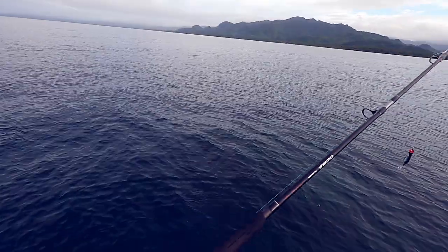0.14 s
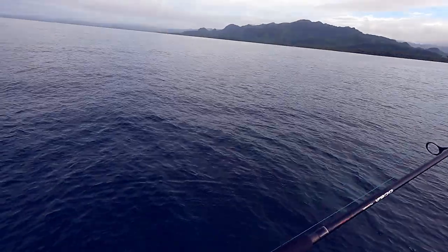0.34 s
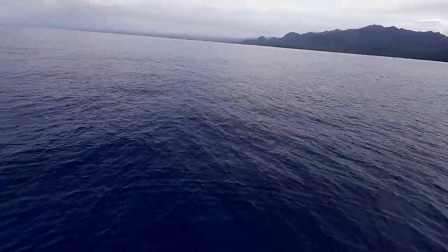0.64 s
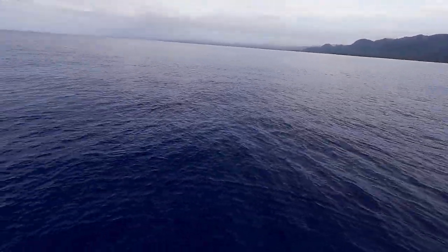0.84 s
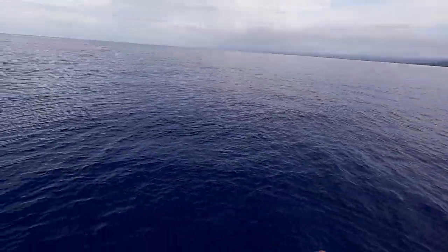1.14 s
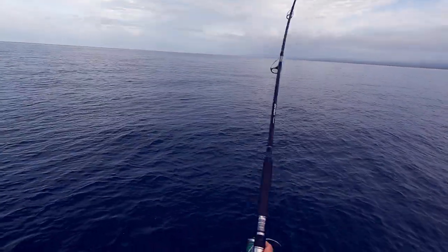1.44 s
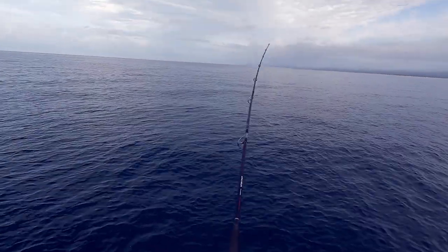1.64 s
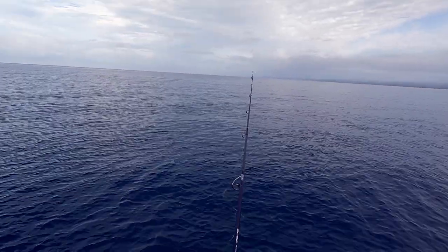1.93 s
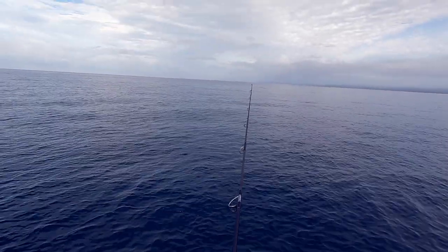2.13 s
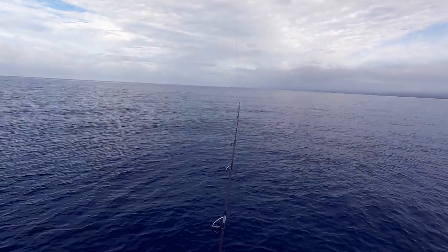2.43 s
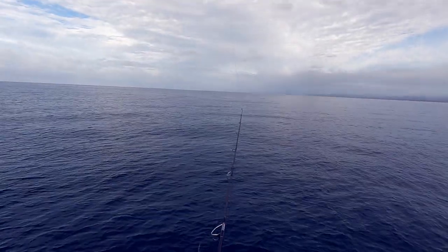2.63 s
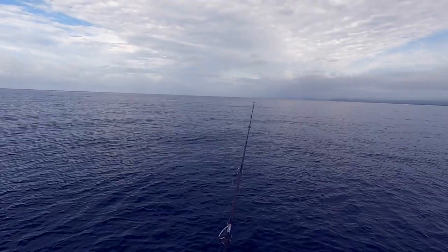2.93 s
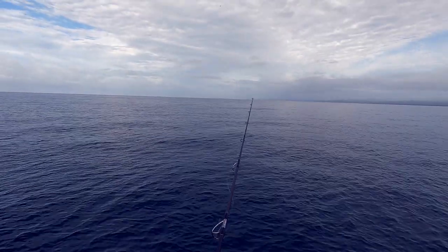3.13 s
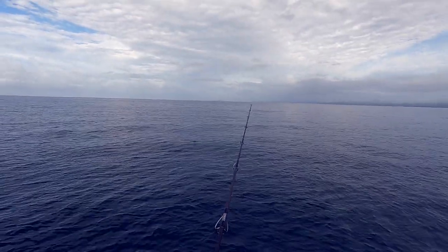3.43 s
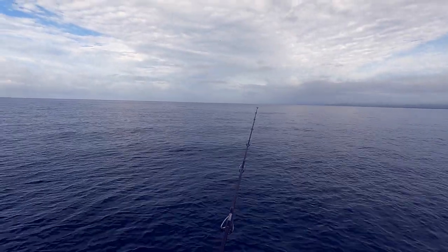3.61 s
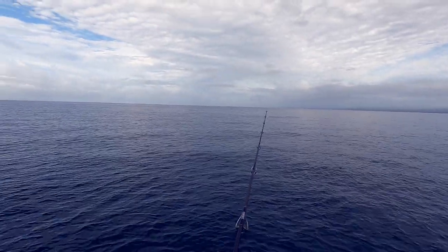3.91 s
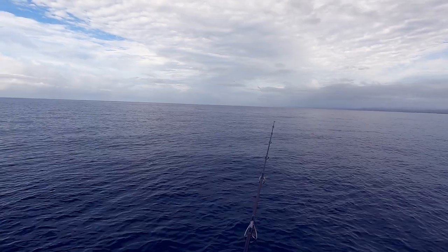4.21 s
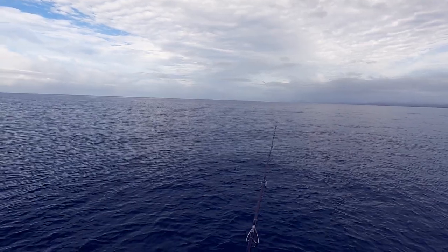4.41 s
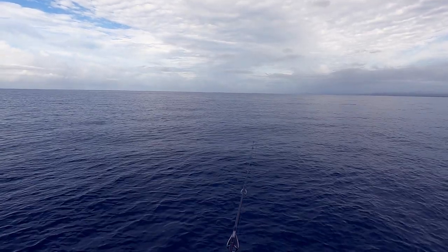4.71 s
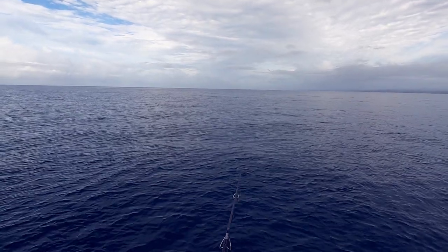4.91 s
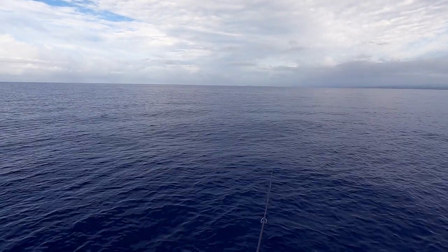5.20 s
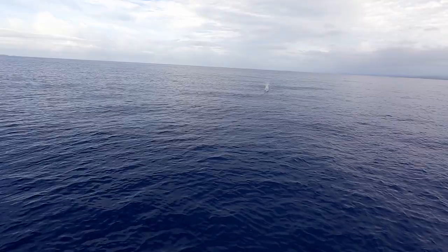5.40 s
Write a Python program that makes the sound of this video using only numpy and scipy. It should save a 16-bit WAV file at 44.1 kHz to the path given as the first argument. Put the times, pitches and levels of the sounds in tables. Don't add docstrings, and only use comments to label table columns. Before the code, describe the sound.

Fishing rod whips through a cast, line hisses off the reel in slowing coils, the bail snaps shut, water slops on a small boat's hull.

```python
import sys
import numpy as np
from scipy import signal
from scipy.fft import rfft, irfft, next_fast_len
from scipy.io import wavfile
from scipy.ndimage import uniform_filter1d, map_coordinates

SR = 44100
rng = np.random.default_rng(int(sys.argv[2]) if len(sys.argv) > 2 else 0)


def store_pcm(level_fs):
    pcm = np.round(np.clip(level_fs, -1, 1) * 32767).astype(np.int16)
    wavfile.write(sys.argv[1], SR, np.atleast_2d(pcm).T)


def ratio(d):
    e = np.asarray(d, float) / 20
    return 10 ** e


N = 244755

# t/s, coil rate/Hz, hiss level/dB
LINE_RUN = [
    (1.57, 164, -43),
    (1.72, 137, -35.5),
    (1.87, 150, -34.5),
    (2.18, 119, -36.5),
    (2.55, 97.5, -39.5),
    (3.0, 70.3, -43.5),
    (3.5, 59, -45.5),
    (4.1, 54.2, -47.5),
    (4.612, 55, -48.5),
]
# f/share of centre, level/dB
HISS_SPECTRUM = [(.1, -14), (.3, -4.5), (.55, -3.5), (.8, 3.5), (1.0, 9), (1.2, 4), (1.5, -11), (2.01, -24),
                 (3, -21)]
HISS_HZ, HISS_HZ_PER_COIL, HISS_TOP_HZ = 2200, 69.9, 12400
HISS_SPREADS = 0.23
SLAP_SHARE, SLAP_GROWS = 0.06, 0.17
SLAP_SOFT_S = 0.002
SLACK_S, SLACK_WIDTH_S, SLACK_DB = 1.655, 0.016, 33
BUMP_S, BUMP_WIDTH_S, BUMP_DB = 5.2, 0.016, 4
# t/s, level/dB
RIM_TOUCHES = [(1.574, -28.5), (1.7, -34), (1.8, -34.5), (1.91, -33), (2.04, -40), (2.19, -40),
               (2.38, -42.5), (2.33, -43.5), (2.5, -48.5), (2.56, -49), (2.71, -46), (2.92, -46),
               (3.14, -55), (3.178, -58), (3.4, -56), (3.53, -63), (3.588, -59), (3.73, -49.5), (3.82, -62),
               (3.935, -51), (3.958, -52), (4.05, -58), (4.132, -56), (4.246, -50), (4.31, -58),
               (4.395, -50), (4.506, -55.5), (4.565, -49.5), (4.267, -54), (4.43, -53), (2.62, -56),
               (1.945, -48), (2.085, -47)]
RIM_RISE_DB_S, RIM_FALL_DB_S = 488, 273
# t/s, level/dB
RIM_STEADY = [(1.57, -47.5), (2.9, -62), (3.8, -55), (4.05, -48), (4.6, -49.5)]
TICKING_DB = 0.5
# f/Hz, width/Hz, level/dB
SPOOL_MODES = [(1178, 190, -6.5), (2180, 600, -9), (3385, 106, 3), (4700, 260, -8)]
# f/Hz, width/Hz, level/dB
FLANGE_MODES = [(10600, 35, 1), (12000, 60, -9), (13260, 33, -8.5)]
# t/s, peak level/dB
COIL_KNOCKS = [(3.585, -50), (3.6462, -41), (3.724, -43), (3.8014, -42), (3.8493, -56), (3.8702, -43),
               (3.9066, -36), (3.9275, -42), (3.9535, -39), (3.9888, -51), (4.0132, -38), (4.0373, -35),
               (4.0585, -41), (4.0922, -36.5), (4.1281, -41), (4.169, -40), (4.2094, -41), (4.2314, -38),
               (4.2841, -39), (4.3032, -35), (4.3242, -39), (4.3416, -38), (4.3571, -41), (4.3786, -33),
               (4.3927, -31), (4.4115, -32.5), (4.4474, -43), (4.4813, -44), (4.5013, -41), (4.5182, -40),
               (4.536, -33), (4.5562, -33), (4.5716, -39)]
# f/Hz, width/Hz, level/dB
RIM_MODES = [(1243, 120, -3.5), (2180, 240, -1.5), (3390, 184, 4), (4700, 550, -6.5), (6500, 2900, -22)]

# t/s, peak level/dB, low part level/dB
RELEASE_BLOWS = [
    (1.573, -26, -18),
    (1.5775, -11, -4),
    (1.5865, -9, -4.5),
    (1.5981, -8.5, 4),
    (1.605, -16, -25),
    (1.639, -32, -15),
    (1.6913, -19, -23),
]
RELEASE_T60_S = 0.024
# f/Hz, width/Hz, level/dB
GUIDE_MODES = [(1500, 330, -3), (2300, 790, -3), (2960, 150, -1), (3380, 310, -6.5), (4500, 190, -3),
               (6360, 780, -9.5), (11800, 980, -11.5)]
# t/s, peak level/dB, low part level/dB, t60/s
BAIL_BLOWS = [
    (4.6104, -17.5, -1, 0.024),
    (4.6184, -9, -13.5, 0.02),
    (4.6288, 2.5, -6.5, 0.022),
    (4.6312, -7, 0, 0.0099),
    (4.6374, -44, -30, 0.014),
    (4.6563, -22, 4.5, 0.05),
    (4.676, -27.5, 1, 0.02),
    (4.6835, -14, -9, 0.023),
    (4.686, -10.5, -3.5, 0.021),
    (4.7024, -27, 7.5, 0.023),
]
# f/Hz, width/Hz, level/dB
BAIL_MODES = [(1200, 420, -6.5), (2010, 230, 0.5), (3150, 930, -10.5), (4440, 250, -3.5), (4930, 480, -1.5),
              (6100, 920, -14.5), (8700, 400, -11.5), (10800, 1700, -24)]
PART_LOW_HZ = 420
# start t/s, end t/s, f/Hz, level/dB
SPRING_SQUEAK = (4.716, 4.764, 5600, -57)
# t/s, level/dB, hold/s, gear tone share/0-1
CRANK_STROKES = [
    (4.777, -47, .01, 0.32),
    (5.085, -56, .01, 0.3),
    (5.17, -57.5, .03, 0.2),
    (5.192, -60.5, 0.17, 0.62),
    (5.31, -62.5, 0.036, 0.1),
    (5.403, -58, 0.043, 0),
    (5.508, -58.5, 0.03, .1),
]
RUB_RISE_DB_S, RUB_FALL_DB_S = 446, 253
# f/Hz, level/dB
SCUFF_SPECTRUM = [(600, -23), (1500, 0), (3000, -7.5), (6000, -13), (9000, -22.5), (13000, -28.5)]
# f/Hz, width/Hz, level/dB
GEAR_MODES = [(4800, 350, -1), (8600, 500, -3), (10400, 400, -9)]

# t/s, level/dB, upper edge f/Hz
CAST_SWISH = [(1.34, -72, 2000), (1.41, -64, 2800), (1.48, -46, 4430), (1.565, -38.5, 6840),
              (1.6, -26.5, 6600), (1.64, -39, 4500), (1.72, -30.5, 4730), (1.9, -41.5, 3230),
              (2.27, -47.5, 2520), (2.5, -56, 2000)]
# t/s, level/dB, upper edge f/Hz
BACK_SWISH = [(.58, -58, 1500), (.7, -57, 2600), (.8, -59, 2300), (.88, -56.5, 2830), (.97, -59, 2980),
              (1.02, -65, 2300), (1.08, -76, 1500)]
# t/s, level/dB
BLANK_HUM = [(1.73, -49), (1.79, -37.5), (1.822, -29), (1.88, -43), (1.95, -41), (2.03, -38.5),
             (2.115, -40), (2.175, -30), (2.28, -49), (2.352, -35), (2.46, -40), (2.54, -61)]
HUM_RISE_DB_S, HUM_FALL_DB_S, HUM_OCTAVE_DB = 226, 354, -10.5

# t/s, peak level/dB, f/Hz
DRY_TICKS = [(0.1487, -52, 4130), (0.608, -48, 6560), (0.618, -52, 5450), (0.634, -54, 4300),
             (1.178, -56, 5050), (1.187, -48, 6500), (1.195, -53, 4620), (1.2244, -60, 4830),
             (1.366, -53.5, 5450), (1.723, -38, 4250), (3.884, -28, 7340), (3.907, -32, 5800),
             (4.7641, -48, 5100), (4.825, -41.5, 4160), (4.961, -52, 6020), (4.963, -46, 2440),
             (5.057, -60, 6000), (4.986, -46, 3950), (5.0724, -34.5, 4120), (5.4644, -51, 4800),
             (5.5294, -67, 5200)]
DRY_T60_S, DRY_CRACK_SHARE = 0.03, 0.6
# t/s, peak level/dB, f/Hz
RINGING_TICKS = [(0.193, -66, 4430), (0.2054, -59, 4000), (0.514, -61, 4400), (1.119, -66, 3800),
                 (4.8173, -44, 3500), (4.844, -45, 4740), (4.855, -40, 4410), (4.999, -41, 4100),
                 (5.0796, -39.5, 3800), (5.4555, -51, 3930), (5.517, -55, 3380)]
RINGING_T60_S, RINGING_CRACK_SHARE = 0.07, 0.12

# t/s, level/dB, hold/s, brightness/dB
HULL_SLOPS = [(0.245, -47.5, 0.2, -13.5), (0.348, -46, 0.01, 0), (0.359, -38.5, 0.0195, -0.5),
              (.41, -51, .025, 0), (0.432, -40.5, 0.0057, 2.5), (0.48, -49, 0.01, -25),
              (0.712, -60, 0.054, -10.5), (1.515, -38, 0.066, -13.5), (1.55, -43, 0.022, -8),
              (1.73, -40, 0.077, -1.5), (1.849, -30, 0.068, -5), (1.94, -42.5, 0.2, 10),
              (2.12, -44.5, 0.15, 15), (2.615, -47.5, 0.013, -20.5), (2.762, -51, 0.014, -18),
              (3.08, -61, 0.019, -16), (3.261, -35.5, 0.055, -6.5), (3.347, -32, 0.025, -8),
              (3.387, -34.5, 0.018, -9), (3.493, -51.5, 0.029, -16), (3.89, -56, 0.22, -10),
              (4.198, -67, 0.14, -10), (4.517, -57, 0.27, -19), (4.675, -37, 0.03, -3.5),
              (4.777, -42.5, 0.091, -2), (4.943, -51, 0.07, 2), (5.374, -45.5, 0.037, -4.5)]
SLOP_RISE_DB_S, SLOP_FALL_DB_S, DULLS_DB_S = 907, 131, 53.5
# f/Hz, density/dB per Hz
SLOP_SPECTRUM = [(71, -9.5), (275, -3), (700, -9), (1500, -12), (3060, -25.5), (7000, -59.5), (12000, -81),
                 (22000, -120)]
# t/s, level/dB
LAPPING = [(0, -56), (.6, -54), (1.4, -58), (2.4, -45), (3.2, -55.5), (3.75, -55.5), (5.0, -56.5),
           (5.35, -59.5), (5.55, -50.5)]
LAP_BRIGHT_DB = -18
# t/s, peak level/dB, f/Hz, t60/s
AIR_POCKETS = [(0.224, -39, 665, 0.071), (0.221, -39, 1297, 0.11), (0.25, -48, 1240, 0.18),
               (0.262, -41, 676, 0.35), (0.3, -43, 760, 0.13), (0.357, -30, 638, 0.19),
               (0.378, -24.5, 590, 0.11), (0.408, -28, 688, 0.18), (0.4, -35.5, 1545, 0.2),
               (0.436, -26, 616, 0.072), (0.458, -33, 715, 0.2), (0.505, -40, 755, .3),
               (0.343, -37, 1170, .1), (0.482, -31, 202, 0.17), (0.701, -41, 885, 0.35),
               (0.73, -39, 832, 0.17), (1.107, -44, 1274, 0.1), (1.6, -25.5, 701, 0.44),
               (1.72, -24.5, 1130, 0.094), (1.855, -23.5, 516, 0.17), (1.865, -16.5, 1252, 0.044),
               (1.89, -18.5, 462, 0.12), (2.11, -18, 707, 0.041), (2.112, -26.5, 1226, 0.16),
               (2.29, -39, 983, 0.13), (4.692, -26.5, 347, 0.37), (4.7, -33, 474, .15),
               (4.715, -28.5, 243, 0.3), (2.607, -35, 406, 0.12), (2.85, -40, 715, 0.16),
               (2.99, -37, 427, 0.27), (3.087, -35, 1170, 0.14), (3.246, -23.5, 1208, 0.066),
               (3.262, -30, 1100, 0.089), (3.246, -29, 1550, .06), (3.247, -39, 2130, 0.058),
               (3.247, -34.5, 3080, 0.067), (3.31, -27, 333, .15), (3.248, -20, 592, 0.038),
               (3.282, -19, 625, 0.07), (3.28, -25, 449, 0.11), (3.278, -40, 2580, 0.1),
               (3.393, -38, 2750, .15), (3.352, -22.5, 830, 0.1), (3.4, -30, 797, 0.083),
               (3.489, -35, 604, 0.35), (3.493, -35.5, 1284, 0.15), (4.766, -32, 982, 0.23),
               (5.078, -26.5, 1004, 0.024), (5.368, -40, 716, 0.1), (5.39, -37, 1200, .15),
               (5.421, -44, 2460, .1), (5.443, -25.5, 998, 0.094), (5.455, -36.5, 1068, 0.19),
               (5.47, -37.5, 948, 0.22)]
# t/s, peak level/dB, f/Hz, t60/s
MORE_POCKETS = [
    (4.7658, -28.5, 2200, 0.091),
    (4.994, -40.5, 1620, 0.2),
    (5.0766, -24.5, 2200, 0.015),
]
# t/s, level/dB, f/Hz, t60/s
SPRAY_BURSTS = [(0.3478, -65, 7960, 0.036), (0.3597, -75, 8350, 0.041), (0.408, -52, 3880, 0.1),
                (0.411, -65, 8000, 0.088), (0.357, -44, 1702, 0.12), (0.4357, -41, 1684, .07),
                (0.7, -56, 1020, .1), (0.509, -66, 6500, .05), (0.716, -64, 9800, .03),
                (3.246, -39, 2840, 0.078), (3.275, -43, 2600, 0.1), (3.3518, -39.5, 3550, 0.13),
                (3.392, -45, 2790, 0.19), (3.394, -42, 3850, .1), (3.425, -51, 2980, 0.075),
                (3.4817, -45, 3220, 0.046), (3.87, -48.5, 1786, 0.61), (3.984, -33.5, 1500, 0.057)]

# t/s, level/dB
GUSTS = [(0, -64), (.45, -65.5), (1.0, -67), (1.16, -56), (1.37, -42.5), (1.59, -46), (1.7, -38.5),
         (2.04, -43.5), (2.3, -40.5), (2.63, -40), (2.89, -39), (3.17, -34), (3.57, -45), (4.2, -46),
         (4.64, -43.5), (4.9, -36.5), (5.33, -39.5), (5.55, -57.5)]
# f/Hz, level/dB
BUFFET_SPECTRUM = [(12, -5), (30, -1.5), (60, -2.5), (100, -8.5), (200, -31), (600, -47.5), (2500, -91),
                   (8000, -120)]
# t/s, level/dB
CLOTH_THUMPS = [(1.26, -42), (1.686, -42), (1.86, -41), (1.97, -45), (2.05, -49), (2.165, -36), (4.69, -41),
                (4.86, -39), (5.2, -42), (2.608, -36.5), (2.65, -43), (2.753, -29), (2.98, -45),
                (3.089, -29), (3.142, -26.5), (3.185, -48), (3.232, -35)]
THUMP_RISE_DB_S, THUMP_FALL_DB_S = 2500, 448
# f/Hz, level/dB
THUMP_SPECTRUM = [(25, -9), (60, -2), (150, 5), (400, -18.5), (800, -44), (4000, -120)]
# t/s, level/dB
CLOTH_FLAPS = [(.45, -67), (1.62, -35.5), (1.8, -30.5), (1.97, -47), (2.19, -38.5), (3.17, -46.5),
               (3.34, -36), (4.7, -56), (4.88, -40), (5.3, -49.5)]
FLAP_RISE_DB_S, FLAP_FALL_DB_S = 162, 132
# f/Hz, level/dB
CLOTH_SPECTRUM = [(30, -34), (70, -12), (110, -8), (170, 3), (260, -7), (500, -55), (1500, -64.5),
                  (8000, -120)]
CLOTH_DB, CLOTH_GROWS = -54.5, 0.073
# f/Hz, density/dB per Hz
SEA_SPECTRUM = [(70, -26), (170, 0), (400, -7), (800, -22), (1150, -12), (1900, -29), (3000, -39),
                (7000, -42), (15500, -57)]
SEA_DB = -56

# f/Hz, likeness/0-1
PORT_LIKENESS = [(90, 1), (250, 0.97), (1000, 0.81), (3000, 0.87), (6000, 0.87), (10000, 0.47),
                 (15000, 0.22)]
# f/Hz, level/dB
PORT_TILT = [(60, 2), (200, 0), (700, .5), (2300, 2), (4400, -2), (8100, -7), (15000, -11)]
# f/Hz, phase/rad
PORT_LEAD = [(100, 0), (780, -.1), (4000, -.8), (7000, -1.3), (9500, -1.7), (12000, -3.2), (15500, -4.1)]
# f/Hz, level/dB
CAPSULE = [(6000, -2), (9000, -6.5), (12500, -9.5), (14000, -11.5), (15700, -19), (15900, -49)]


def line():
    coils, hiss_db = curves(LINE_RUN)
    bump = lambda s, width: np.exp(-((np.arange(N) / SR - s) / width) ** 4)
    hiss_db = hiss_db - SLACK_DB * bump(SLACK_S, SLACK_WIDTH_S) + BUMP_DB * bump(BUMP_S, BUMP_WIDTH_S)

    phase = np.cumsum(2 * coils * (1 + 0.097 * wobble(40))) / SR
    count = phase.astype(int)
    contacts = count[-1] + 1
    size_db = 2 * rng.standard_normal(contacts).clip(-2, 1.5) - 5 * (np.arange(contacts) % 2)
    since_s = (phase % 1) / (2 * coils)
    slap = ratio(size_db)[count] * ratio(-60 * since_s / 0.022)
    slap = unit(uniform_filter1d(slap, size=int(SLAP_SOFT_S * SR)))
    share = np.clip(SLAP_SHARE + SLAP_GROWS * np.log2(coils.max() / coils), 0, 1)
    gate = 1 - share + share * slap

    def hiss_shape(hz, t):
        centre = np.minimum(HISS_HZ + HISS_HZ_PER_COIL * curves(LINE_RUN, t)[0], HISS_TOP_HZ)
        return along(HISS_SPECTRUM, (hz / centre) ** (centre / HISS_TOP_HZ) ** HISS_SPREADS)

    hiss = rush(hiss_shape, patchy_db=2.5)
    rubbing = noise_pair() * ratio(1.9 * wobble(45)) * gate * (0.62 + 0.31 * slap)
    rim = unit(filtered(rubbing, resonances(SPOOL_MODES)))
    flange = unit(filtered(noise_pair() * ratio(4 * wobble(22)), lambda f: resonances(FLANGE_MODES)(f) ** 2))
    ticks = unit(filtered(noise_pair() * slap, lambda f: f / (f + 1500j) / (1 + (f / 11000) ** 4)))
    lip = unit(filtered(noise_pair() * (0.4 + 0.52 * slap), resonances(SPOOL_MODES[2:3])))
    touch = swells(RIM_TOUCHES, RIM_RISE_DB_S, RIM_FALL_DB_S).sum(0) * (lip + ratio(-7.5) * rim)
    steady = ratio(curves(RIM_STEADY)[0]) * (rim + ratio(TICKING_DB) * ticks + ratio(-20.5) * flange)
    return during(LINE_RUN) * (ratio(hiss_db) * gate * hiss + touch + steady)


def strikes():
    out, t = np.zeros((2, N)), np.arange(SR // 40) / SR
    for s, db in COIL_KNOCKS:
        contact = ratio(-60 * t / 0.018) * (1 - np.exp(-t / 0.00065)) * noise_pair(len(t))
        contact[0, 40] += 4.5
        add(out, s, ratio(db + 13.5) * contact)
    return filtered(out, resonances(RIM_MODES))


def reel():
    strokes = swells(CRANK_STROKES, RUB_RISE_DB_S, RUB_FALL_DB_S)
    grain = lambda: noise_pair() * ratio(2.0 * wobble(110))
    scuff = unit(filtered(grain(), lambda f: ratio(along(SCUFF_SPECTRUM, f))))
    gears = unit(filtered(grain(), lambda f: resonances(GEAR_MODES)(f) ** 2))
    gear_level = 2.35 * np.transpose(CRANK_STROKES)[-1] ** 2 @ strokes
    crank = strokes.sum(0) * scuff + gear_level * gears

    release = knocked([row + (RELEASE_T60_S,) for row in RELEASE_BLOWS], GUIDE_MODES, tail_db=-14.0)
    bail = knocked(BAIL_BLOWS, BAIL_MODES, tail_db=-16.0)
    start, end, hz, db = SPRING_SQUEAK
    tone = np.sin(2 * np.pi * hz * np.arange(N) / SR)
    squeak = ratio(db) * during([[start], [end]]) * tone * [[1], [0]]
    return release + bail + squeak + crank


def knocked(blows, modes, tail_db):
    high, low, t = np.zeros((2, N)), np.zeros((2, N)), np.arange(SR // 16) / SR
    for s, db, low_db, t60 in blows:
        decay = ratio(-60 * t / t60) + ratio(tail_db - 60 * t / 0.12)
        blow = noise_pair(len(t)).clip(-1.5, 1.5) * (1 - np.exp(-t / 0.00024)) * decay
        blow[0, 50] += 6
        add(high, s, ratio(db + 4.0) * blow)
        add(low, s, ratio(db + low_db + 7.5) * blow)
    wide = lambda f: ratio(-17.0) * (f / 1300) ** 3 / (1 + (f / 1300) ** 3) / (1 + (f / 7000) ** 2)
    low_part = filtered(low, lambda f: resonances(modes[:3])(f) * (f / (f - 1j * PART_LOW_HZ)) ** 2)
    return low_part + filtered(high, lambda f: resonances(modes[3:])(f) + wide(f))


def rod():
    level = swells(BLANK_HUM, HUM_RISE_DB_S, HUM_FALL_DB_S).sum(0)
    turn = 2 * np.pi * np.cumsum(curves(LINE_RUN)[0]) / SR
    hum = np.sqrt(2) * level * (np.sin(turn) + ratio(HUM_OCTAVE_DB) * np.sin(2 * turn))
    return swish(BACK_SWISH, steep=4.5) + swish(CAST_SWISH, steep=1.2) + hum * [[1], [0]]


def swish(rows, steep):
    def shape(hz, t):
        bass_db = -7 * np.log2(350 / (hz + 30)).clip(0)
        return bass_db - 18 * np.minimum((hz / curves(rows, t)[1]) ** steep, 6)

    return during(rows, 0.026) * ratio(curves(rows)[0]) * rush(shape, patchy_db=1.0)


def tackle():
    out, t = np.zeros((2, N)), np.arange(SR // 12) / SR
    dry_ticks = [row + (DRY_T60_S, DRY_CRACK_SHARE) for row in DRY_TICKS]
    ringing = [row + (RINGING_T60_S, RINGING_CRACK_SHARE) for row in RINGING_TICKS]
    for s, db, hz, t60, share in dry_ticks + ringing:
        rough = uniform_filter1d(noise_pair(len(t)), size=60, axis=1)
        ring = (0.39 + 6 * rough) * np.sin(2 * np.pi * hz * t) * ratio(-60 * t / t60) * (1 - np.exp(-t / 0.00009))
        edge = uniform_filter1d(noise_pair(len(t)), size=5, axis=1)
        crack = 1.84 * edge * np.sin(2 * np.pi * 0.9 * hz * t) * ratio(-60 * t / 0.03)
        add(out, s, ratio(db + 1.5) * ((1 - share) * ring + share * crack))
    return out


def water():
    return slops() + pockets()


def slops():
    t = np.arange(0, N, 64) / SR
    each = swells(HULL_SLOPS, SLOP_RISE_DB_S, SLOP_FALL_DB_S, t)
    lap = ratio(curves(LAPPING, t)[0])
    fresh_db = np.array([b - DULLS_DB_S * (t - s).clip(0) for s, _, _, b in HULL_SLOPS]).clip(LAP_BRIGHT_DB)
    level = each.max(0) + lap
    power = (each ** 2).sum(0) + lap ** 2
    colour_db = ((each ** 2 * fresh_db).sum(0) + lap ** 2 * LAP_BRIGHT_DB) / power

    def shape(hz, at):
        bright_db = np.clip(np.interp(at, t, colour_db), -20, 1) + 5
        return along(SLOP_SPECTRUM, hz) + bright_db * np.log2(hz / 500 + 0.00078).clip(0, 2.5) / 0.9

    slop = rush(shape, patchy_db=2.0)
    return np.interp(np.arange(N) / SR, t, level) * ratio(-1.5 + 1.9 * wobble(110)) * slop


def pockets():
    out, t = np.zeros((2, N)), np.arange(SR // 8) / SR
    smooth = lambda a, b: uniform_filter1d(uniform_filter1d(noise_pair(len(t)), size=a), size=b)
    for s, db, hz, t60 in AIR_POCKETS + MORE_POCKETS:
        rough = [[.85], [0]] + 5 * smooth(50, 30)
        pocket = rough * np.sin(2 * np.pi * np.cumsum(hz * (1 + 0.066 * t / t60)) / SR)
        slap = 1.1 * smooth(10, 7) * ratio(-60 * t / 0.023)
        add(out, s, ratio(db - 5.5 - 60 * t / t60) * (1 - np.exp(-t / 0.00049)) * (pocket + slap))
    return out


def spray():
    out, t = np.zeros((2, N)), np.arange(SR // 6) / SR
    for s, db, hz, t60 in SPRAY_BURSTS:
        drops = unit(uniform_filter1d(noise_pair(len(t)), size=int(8e4 / hz), axis=1))
        level = ratio(db - 60 * t / t60) * (1 - np.exp(-t / 0.0012))
        add(out, s, level * drops * np.sin(2 * np.pi * hz * t))
    return out


def wind():
    gust_db, = curves(GUSTS)
    noise = lambda shape: unit(filtered(noise_pair(), lambda hz: ratio(along(shape, hz))))
    lumps = ratio(1.53 * np.array([wobble(6.4), wobble(14)]))
    buffet = ratio(gust_db + [[9], [6]]) * unit(lumps * noise(BUFFET_SPECTRUM))
    thumps = swells(CLOTH_THUMPS, THUMP_RISE_DB_S, THUMP_FALL_DB_S).sum(0) * noise(THUMP_SPECTRUM)
    rumble = ratio(CLOTH_DB + CLOTH_GROWS * (gust_db - gust_db.mean()))
    flaps = swells(CLOTH_FLAPS, FLAP_RISE_DB_S, FLAP_FALL_DB_S).sum(0)
    return buffet + thumps, (rumble + flaps) * noise(CLOTH_SPECTRUM)


def sea():
    return ratio(SEA_DB) * rush(lambda hz, t: along(SEA_SPECTRUM, hz), patchy_db=1.5)


def ports(pair):
    turn = lambda hz: np.arccos(np.clip(along(PORT_LIKENESS, hz), 0, 1)) / 2
    mid, side = filtered(pair, lambda hz: np.array([np.cos(turn(hz)), np.sin(turn(hz))]))
    half = lambda hz: ratio(along(PORT_TILT, hz) / 2) * np.exp(.5j * along(PORT_LEAD, hz))
    return filtered(np.array([mid + side, mid - side]), lambda hz: np.array([half(hz), 1 / half(hz)]))


def noise_pair(n=N):
    return rng.standard_normal((2, n))


def unit(x):
    return x / np.sqrt(np.mean(x ** 2) + 1e-20)


def along(points, hz):
    f, v = np.transpose(points)
    return np.interp(np.log(hz + 1e-3), np.log(f), v)


def curves(rows, times=None):
    s, *cols = np.transpose(rows)
    return [np.interp(np.arange(N) / SR if times is None else times, s, c) for c in cols]


def during(rows, fade=0.0015):
    t = np.arange(N) / SR
    return np.clip(np.minimum(t - rows[0][0], rows[-1][0] - t) / fade, 0, 1)


def swells(rows, rise, fall, times=None):
    t = np.arange(N) / SR if times is None else times
    gains = []
    for s, db, *hold in rows:
        end = s + sum(hold[:1])
        ramp_db = np.minimum(rise * (t - s), fall * (end - t))
        gains.append(ratio(db + np.minimum(ramp_db, 0)))
    return np.array(gains)


def wobble(rate):
    return map_coordinates(rng.standard_normal(int(N * rate / SR) + 4), [np.arange(N) * rate / SR])


def filtered(x, response):
    m = next_fast_len(N + 8192)
    return irfft(rfft(x, m) * response(np.fft.rfftfreq(m, 1 / SR)), m)[..., :N]


def resonances(modes):
    def response(f):
        return sum((-1) ** k * ratio(db) * 1j * f * w / (c * c - f * f + 1j * f * w)
                   for k, (c, w, db) in enumerate(modes))
    return response


def rush(shape_db, patchy_db):
    hz, t, z = signal.stft(noise_pair(), SR, nperseg=512)
    field = rng.standard_normal(z.shape[1:])
    field = uniform_filter1d(uniform_filter1d(field, size=5, axis=0), size=5, axis=1)
    gain = ratio(shape_db(hz[:, None], t[None]) + patchy_db * unit(field) + 0 * t)
    gain = gain / np.sqrt(np.mean(gain ** 2, axis=0))
    return unit(signal.istft(z * gain, SR, nperseg=512)[1][:, :N])


def add(track, s, sound):
    piece = track[:, round(s * SR):round(s * SR) + sound.shape[1]]
    piece += sound[:, :piece.shape[1]]


def scene():
    buffet, cloth = wind()
    background = cloth + sea()
    cast = line() + strikes() + rod()
    boat = water() + spray() + tackle()
    return ports(cast + boat + reel() + background) + buffet


def roll_off(x):
    return signal.sosfilt(signal.butter(12, 16500, fs=SR, output="sos"), x)


def record(dry):
    loud = np.tanh(dry / 3) * 3
    mix = filtered(loud, lambda hz: ratio(along(CAPSULE, hz))).clip(-.97, .97)
    return roll_off(mix)


dry = scene()
out = record(dry)
store_pcm(out)
```